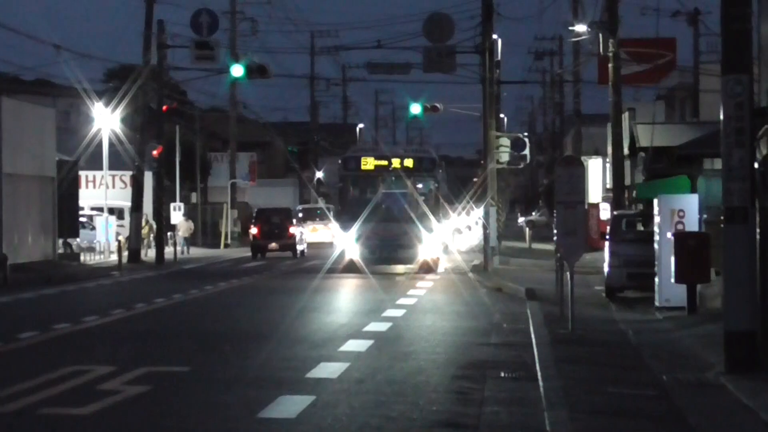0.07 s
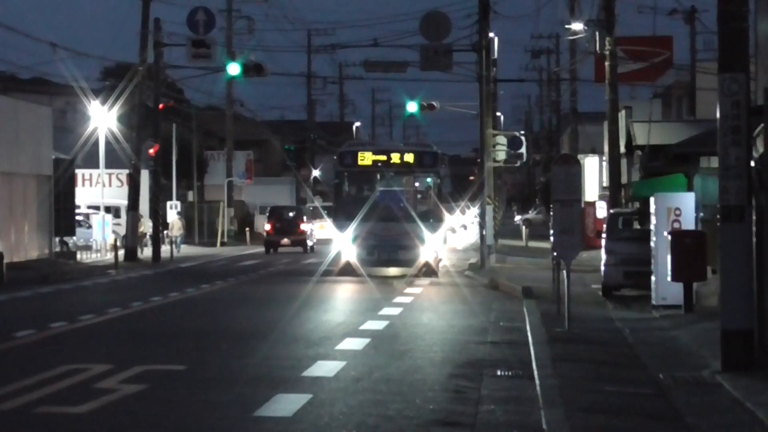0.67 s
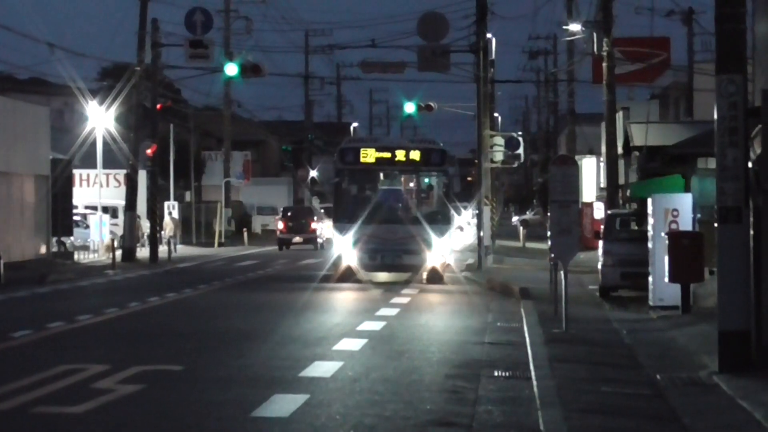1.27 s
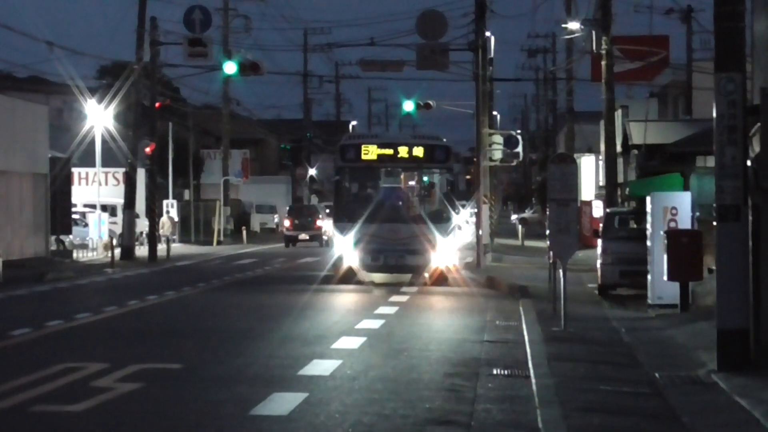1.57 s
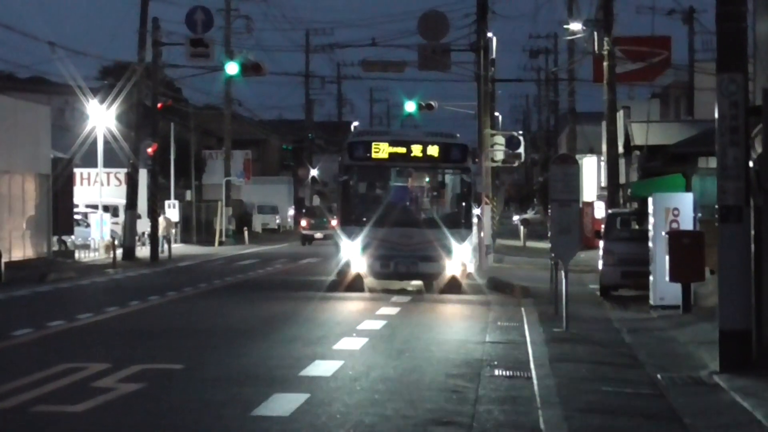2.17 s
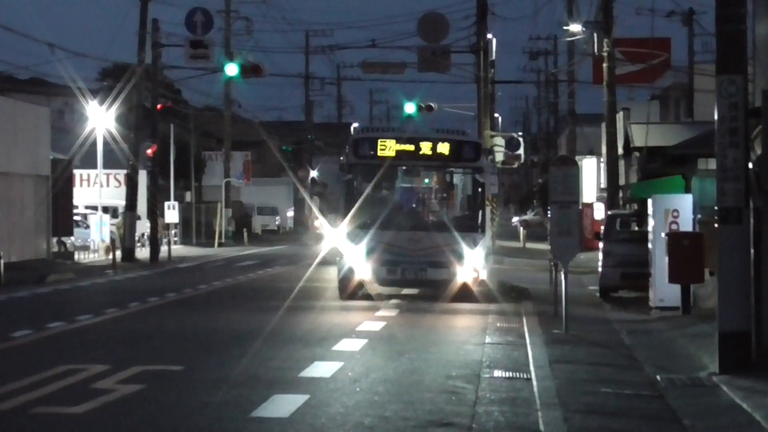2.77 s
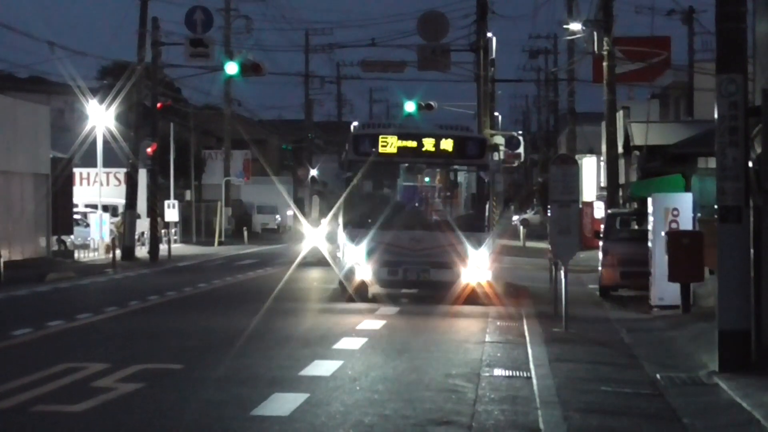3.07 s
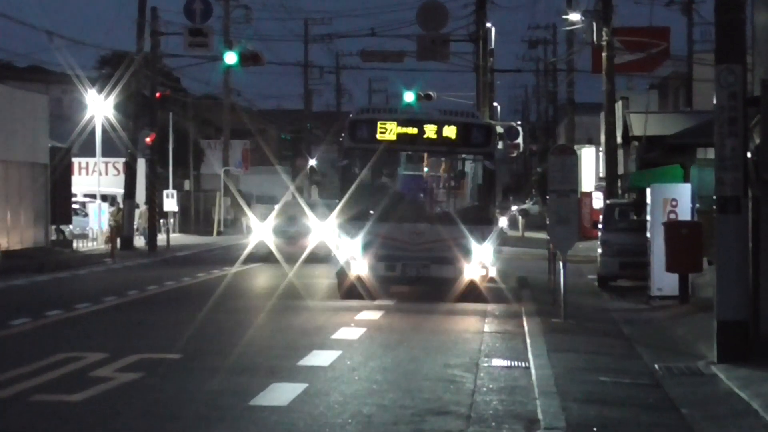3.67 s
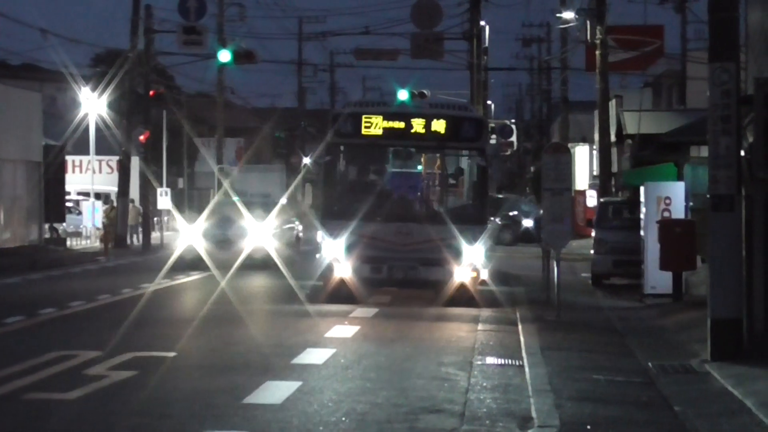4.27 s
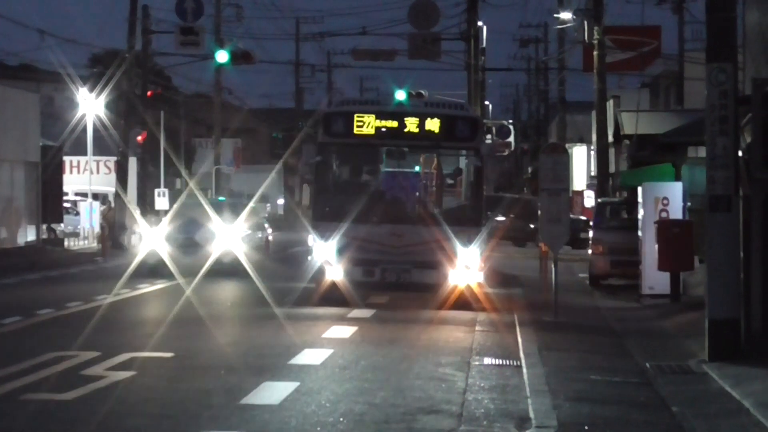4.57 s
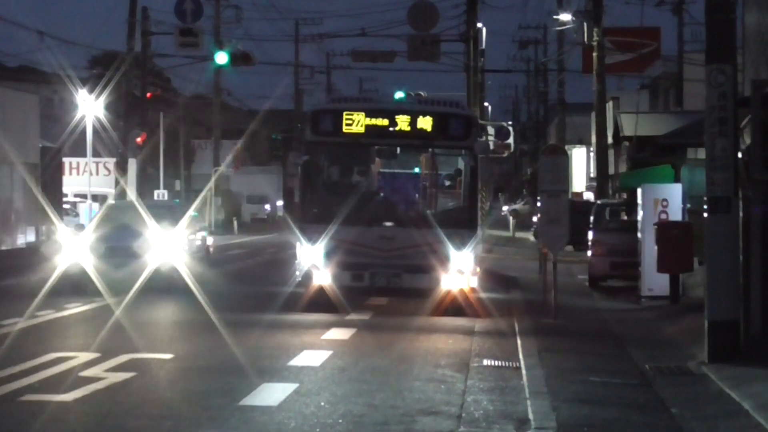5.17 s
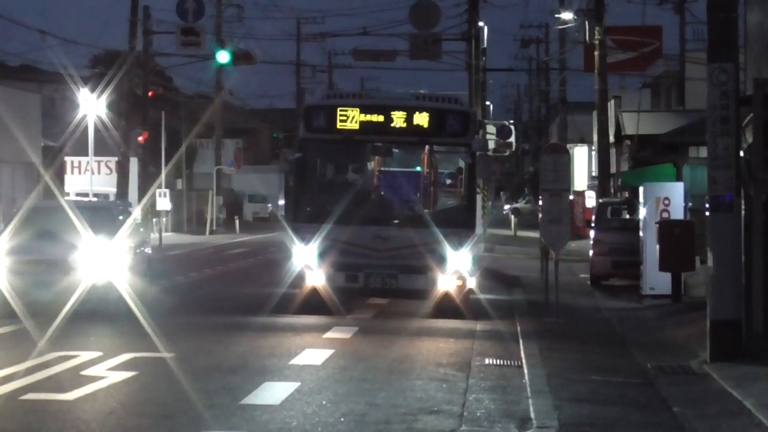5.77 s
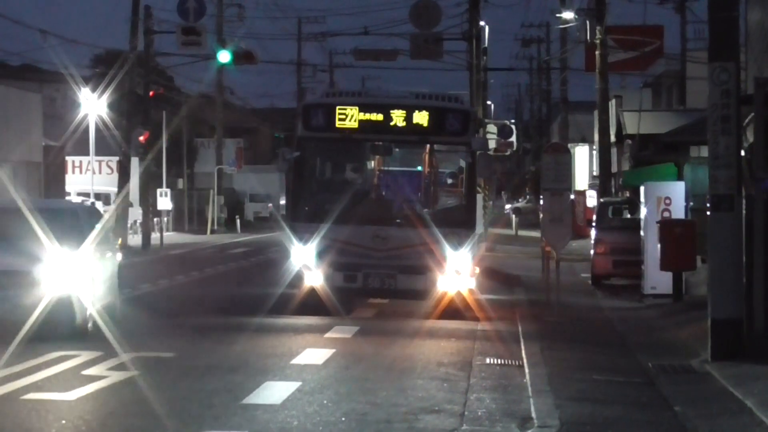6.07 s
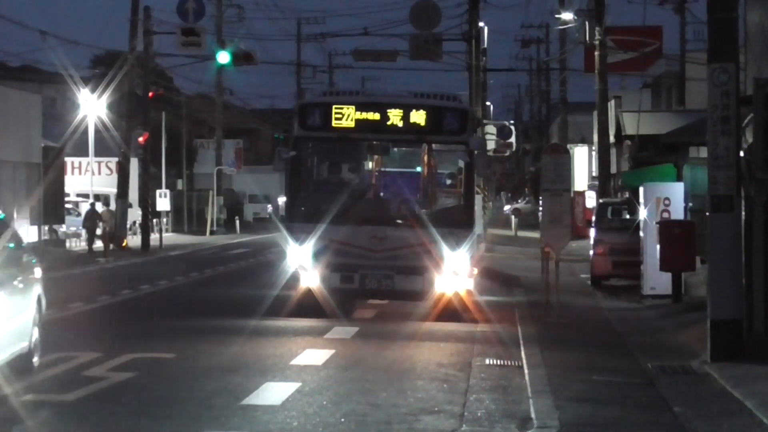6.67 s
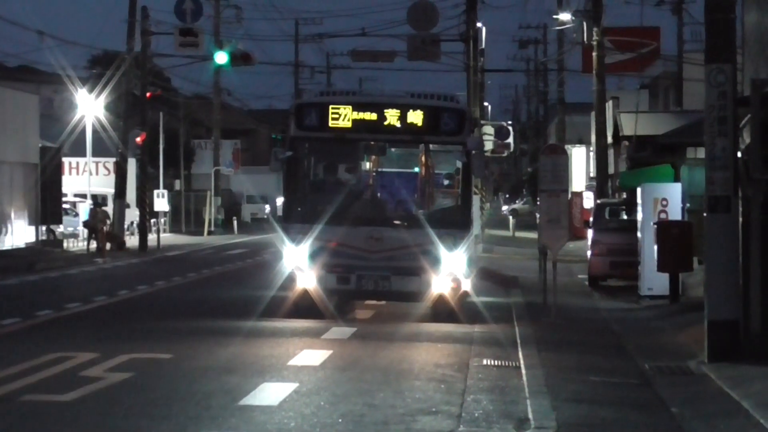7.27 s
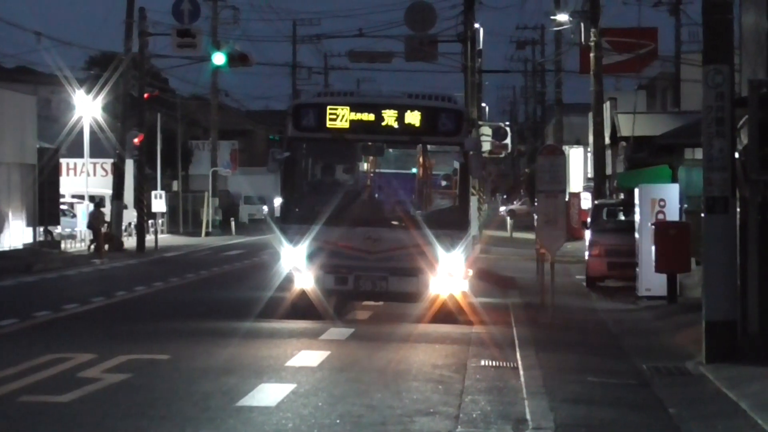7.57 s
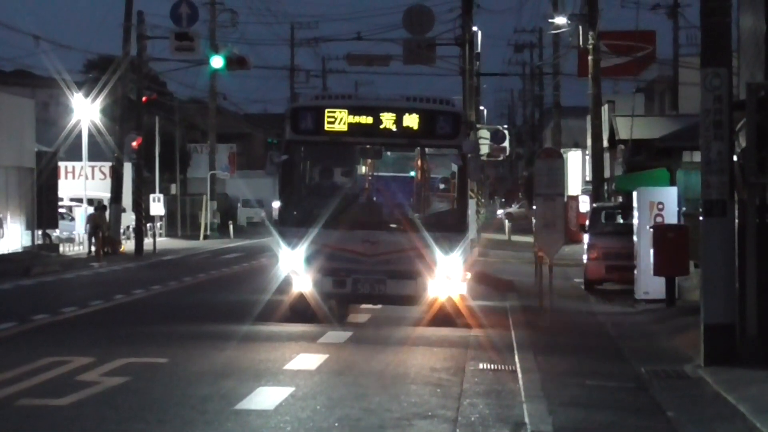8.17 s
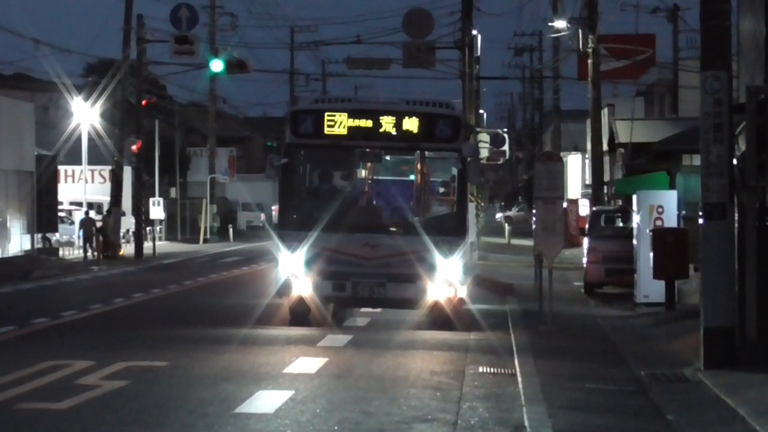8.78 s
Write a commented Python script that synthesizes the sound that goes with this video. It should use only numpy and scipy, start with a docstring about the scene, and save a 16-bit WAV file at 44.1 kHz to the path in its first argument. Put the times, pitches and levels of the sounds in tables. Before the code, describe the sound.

A city bus approaches a roadside microphone with a low engine rumble, a faint rattle and a soft wheel knock, over far traffic and slight wind. It slows with a wavering, high-pitched brake squeal flecked with small chirps. A car draws near, sets a road cover clanking quickly as the squeal ends, and goes by just to the left, its tyre noise peaking and then turning duller.

```python
"""On a narrow street at dusk, far traffic hums and light puffs of wind touch the microphone.
A city bus draws near, its engine rumbling; a loose panel ticks and its wheels knock on a cover.
From about 2 s it slows for a stop, and friction drives its brake drums into a thin, high squeal.
An oncoming car overtakes it, clatters over a cover in the road near 6.7 s as the squeal dies,
and passes close on the left at 8 s in a swell of tyre noise."""
import sys
import numpy as np
from scipy import signal
from scipy.fft import rfft, irfft, next_fast_len
from scipy.io import wavfile
from scipy.ndimage import uniform_filter1d, map_coordinates

SR = 44100
rng = np.random.default_rng(int(sys.argv[2]) if len(sys.argv) > 2 else 0)


def wav_out(sig):
    """Save sig, one row per channel (or a flat mono array), as 16-bit PCM at SR to the path in sys.argv[1]."""
    wavfile.write(sys.argv[1], SR, np.round(np.clip(np.atleast_2d(sig).T, -1, 1) * 32767).astype(np.int16))


N = 388962
TIME = np.arange(N) / SR

# The bus slows to a crawl: time_s, share_of_first_speed
BUS_SPEED = [(2.7, 0.94), (4.5, 0.68), (6.6, 0.17)]
# Main squeal, following the pedal from a first light touch: time_s, level_db
SQUEAL_LEVEL = [(2.2, -63), (2.32, -55), (2.44, -71), (2.55, -62), (2.66, -64), (2.73, -52.5),
                (2.93, -46.5), (3.03, -54.5), (3.15, -51.5), (3.37, -53), (3.58, -40.5), (3.82, -50.5),
                (4.0, -43.5), (4.2, -42.5), (4.36, -43), (4.52, -33.5), (4.85, -38), (5.05, -35.5),
                (5.7, -36.5), (5.95, -35.5), (6.23, -38.5), (6.29, -45.5), (6.42, -44.5), (6.49, -59),
                (6.71, -60)]
# Pitch of the main squeal: time_s, pitch_hz
SQUEAL_PITCH = [(2.22, 8020), (2.5, 8120), (2.75, 8125), (3.7, 8105), (3.95, 8075), (4.15, 8110),
                (4.42, 8065), (4.7, 8080), (5.04, 8015), (5.28, 8068), (5.5, 8058), (5.75, 8095),
                (6.0, 8100), (6.22, 8122), (6.44, 8095), (6.55, 8000), (6.68, 7925)]
# A second brake joins a little higher: time_s, pitch_hz, level_db
SECOND_BRAKE = [(4.15, 8480, -71), (4.55, 8440, -54.5), (4.75, 8475, -54), (5.07, 8425, -52.5),
                (5.27, 8500, -49), (5.45, 8450, -45.5), (5.7, 8360, -50), (5.92, 8300, -47.5),
                (6.12, 8230, -59)]
# Spectrum of the sliding linings: frequency_hz, density_db
SCRAPE_SPECTRUM = [(2600, -14), (3500, 0), (4400, -5), (5600, -11)]
def brakes(rasp_db=-12, scrape_db=-68):
    """Self-excited vibration: friction keeps modes of the drums singing at a trembling pitch."""
    steady_hz, = in_time(SQUEAL_PITCH)
    level_db, = in_time(SQUEAL_LEVEL)
    speed, = in_time(BUS_SPEED)
    hz = steady_hz + (6 + 26 * speed ** 2) * drift(130)
    # the faster the lining slides, the more its grain roughens the tone
    rasp = 1 + from_db(rasp_db) * speed ** 2 * drift(100)
    main = from_db(level_db) * gate(SQUEAL_LEVEL) * rasp * drum_modes(hz, speed, doppler_hz=138.4)
    # the second brake loses its hold on the pitch as it dies away
    second_hz, second_db = in_time(SECOND_BRAKE)
    second_hz += np.interp(TIME, [5.3, 5.7], [22, 105]) * drift(190)
    second = from_db(second_db) * gate(SECOND_BRAKE) * drum_modes(second_hz, speed, doppler_hz=59)
    scrape = from_db(scrape_db) * gate(SQUEAL_LEVEL, fade_s=0.22) * noise(SCRAPE_SPECTRUM)
    return pan(main + second + scrape, left_db=1.2)


def drum_modes(hz, speed, doppler_hz, beat_hz=18.4, twin_db=-7, scatter_db=1, echo_db=-7):
    """Beating: two close modes interfere; their sum with many reflections is held at a steady level."""
    pair = rms_one(tone(hz) + from_db(twin_db) * tone(hz - beat_hz))
    heard = pair + from_db(scatter_db) * wall_paths(hz, speed, doppler_hz)
    heard += from_db(echo_db) * street_echo(pair, correlation=0.14)
    return heard / np.sqrt(uniform_filter1d(heard ** 2, size=SR // 9) + 1e-6)


def wall_paths(hz, speed, doppler_hz, fading_hz=14, wander_hz=14, width=0.71):
    """Doppler effect: paths leaving the bus sideways rise less in pitch; each wanders and fades alone."""
    paths = 0
    for share in (0, 0.25, 1):
        path = tone(hz - share * doppler_hz * speed + wander_hz * drift(19.94))
        paths += path * (drift(fading_hz) + width * drift(fading_hz) * [[1], [-1]])
    return rms_one(paths)


# Under the hardest braking the drum catches at half the squeal's pitch:
# centre_s, length_s, level_db, third_harmonic_db
DRUM_SPURTS = [(4.24, .05, -63, -80), (4.965, .12, -58.5, -71), (5.048, .06, -54.5, -70),
               (5.162, .13, -51, -63), (5.285, .07, -54, -72), (5.352, .11, -45.5, -61),
               (5.435, .06, -50.5, -65), (5.49, .08, -56, -64)]
# Other brake modes chirp, each sagging in pitch: centre_s, length_s, pitch_hz, level_db, left_db
MODE_CHIRPS = [(2.35, .2, 9020, -72, 0), (4.22, .07, 12150, -74, -5), (4.56, .08, 12200, -72, -4),
               (4.88, .15, 11000, -68, 0), (4.905, .06, 11040, -57, -1), (5.29, .08, 11000, -66, -1),
               (5.36, .12, 5885, -73, 2), (5.485, .09, 5875, -68.5, 3), (5.63, .11, 12450, -65.5, -5),
               (5.855, .13, 12460, -67, -5), (5.865, .15, 5958, -65, 5), (5.87, .16, 14050, -74, -2),
               (6.08, .17, 5952, -69, 2), (6.1, .15, 12457, -66, -3), (6.29, .08, 5958, -67, 4),
               (6.37, .1, 5930, -72, 3)]
def brake_chirps(chatter_db=4.5, tremble_share=0.0028, sag_hz_per_s=300, echo_db=-6):
    """Intermittent excitation: fainter drum modes catch for a moment and reverberate in the street."""
    steady_hz, = in_time(SQUEAL_PITCH)
    half_hz = steady_hz / 2 + 6 * drift(40)
    envelopes = [np.sqrt(swell(s, length)) * from_db([[db], [third_db]])
                 for s, length, db, third_db in DRUM_SPURTS]
    spurt, overtone = np.max(envelopes, axis=0)
    chatter = from_db(chatter_db * drift(45))
    tremble = 1 + tremble_share * drift(68)
    out = pan(spurt * tone(half_hz), left_db=1.5)
    out += pan(overtone * chatter * tone(3 * half_hz), left_db=-4)
    for s, length, hz, db, left_db in MODE_CHIRPS:
        now = np.abs(TIME - s) < length / 2
        pitch_hz = hz * tremble[now] - sag_hz_per_s * (TIME[now] - s)
        out[:, now] += pan(from_db(db) * swell(s, length)[now] * chatter[now] * tone(pitch_hz), left_db)
    echo = from_db(echo_db)
    return (out + echo * street_echo(out.mean(axis=0), correlation=0)) / np.hypot(1, echo)


# Spectrum of engines and rolling wheels: frequency_hz, density_db
RUMBLE_SPECTRUM = [(30, -21), (60, -18.5), (85, -6.5), (130, -6), (165, -6.5), (205, 4), (250, 1),
                   (285, -3), (335, -5), (400, -24), (600, -33), (1200, -58)]
# Uneven road makes the wheels boom: centre_s, length_s, level_db
WHEEL_BOOMS = [(.42, 0.92, -37.5), (1.08, 0.39, -34), (3.433, 0.48, -35.5), (4.142, 0.17, -35),
               (6.848, 0.77, -29)]
def rumble(bus_db=-39, rise_db_per_s=0.1449, car_db=-29.5, car_falloff=0.37, rear_db=3.5, throb_db=1.0):
    """Low-frequency radiation: the engines and wheels of bus and car grow louder as they draw near."""
    spreading_db, bearing = car_path()
    booms = sum(from_db(db) * swell(s, length) for s, length, db in WHEEL_BOOMS)
    bus = np.hypot(from_db(bus_db + rise_db_per_s * TIME), booms) * noise(RUMBLE_SPECTRUM)
    emerged = ramp(EMERGED_S - EMERGING_S, EMERGING_S)
    car_gain = from_db(car_db + car_falloff * spreading_db - rear_db * bearing) * emerged
    car = butterworth(car_gain * noise(RUMBLE_SPECTRUM), 120, "high")   # lighter, so less deep bass
    return pan(from_db(throb_db * drift(44)) * (bus + car), left_db=1.5)


# Spectra of the car's tread roar, hiss, body drone and fine sizzle: frequency_hz, density_db
ROAR_SPECTRUM = [(200, -5), (430, -25.5), (600, -3.5), (760, 0), (950, 1), (1120, -2.5), (1300, -9),
                 (1600, -37), (2000, -40), (2600, -28)]
HISS_SPECTRUM = [(800, -55), (1350, 17.5), (1650, 13.5), (1820, 7.5), (2050, 9.5), (2250, 4.5),
                 (2550, -4.5), (3100, -4), (3500, -1), (4400, -6.5), (5300, -13.5), (7000, -13.5),
                 (10000, -33), (15500, -50)]
BODY_SPECTRUM = [(70, -72), (140, -12), (200, -17), (260, 6.5), (330, 5.5), (420, -2), (520, -0.5),
                 (700, -13), (1000, 1.5), (1500, -43)]
SIZZLE_SPECTRUM = [(3000, -29), (5400, -29), (6600, 0), (7600, 1), (9200, 2), (10500, -4.5), (12500, -5.5),
                   (14500, -13), (16000, -28)]
# The car's tyre roar surges briefly as it nears and passes: centre_s, length_s, gain_db
TYRE_SURGES = [(3.9, 0.27, 6.5), (6.144, 0.72, 2), (7.68, .6, 1.8), (8.165, 0.085, 4.8)]
# The car leans left, most of all once it has passed: time_s, left_db
CAR_BALANCE = [(5.5, -1), (7.7, 0.5), (8.05, 3.5), (8.3, 2.5), (8.8, 3.5)]
EMERGED_S, EMERGING_S = 4.64, 1.33   # when the car is clear of the bus, and its run-up to that
def passing_car(screen_db_per_s=9.774, grain_db=0.5, right_lag_s=61e-6):
    """Rolling noise: the tyres roar and hiss as the car leaves the bus's acoustic shadow and goes by."""
    screen = from_db(-screen_db_per_s * np.maximum(EMERGED_S - TIME, 0))
    road = screen * from_db(grain_db * drift(35))   # coarse asphalt shakes all tyre noise together
    surges = from_db(sum(db * swell(s, length) for s, length, db in TYRE_SURGES))
    roar = surges * radiated(ROAR_SPECTRUM, near_db=-20, front_db=1.7, falloff=0.92)
    hiss = surges ** 0.36 * radiated(HISS_SPECTRUM, near_db=-31, front_db=2.5, falloff=0.83)
    body = surges ** 0.72 * radiated(BODY_SPECTRUM, near_db=-22.5, front_db=-0.86, falloff=0.9)
    sizzle = surges ** 0.27 * radiated(SIZZLE_SPECTRUM, near_db=-44.5, front_db=0, falloff=0.75)
    # once the car is behind the microphone, its treble is shaded off
    shaded = ramp(8.19, 0.14)
    hiss *= from_db(-3 * shaded)
    sizzle *= from_db(-16 * shaded)
    left_db, = in_time(CAR_BALANCE)
    treble = pan(hiss, left_db=2) + pan(sizzle, 0.35 * left_db)
    left, right = pan(road * roar + screen * body, left_db) + road * treble
    # as the car goes by, its sound comes to reach the right side later
    _, bearing = car_path()
    lag_samples = right_lag_s * SR * (1 - bearing) / 2
    return np.array([left, map_coordinates(right, [np.arange(N) - lag_samples], order=3, mode="nearest")])


def car_path(pass_s=7.96, speed_m_per_s=11.44, lane_m=3.71):
    """Spherical spreading on a straight pass: dB relative to the nearest, bearing (1 ahead, -1 behind)."""
    ahead_m = speed_m_per_s * (pass_s - TIME)
    distance_m = np.hypot(ahead_m, lane_m)
    return 20 * np.log10(lane_m / distance_m), ahead_m / distance_m


def radiated(spectrum, near_db, front_db, falloff):
    """Directivity and spreading: a car noise with a forward bias, fading as distance ** -falloff."""
    spreading_db, bearing = car_path()
    return from_db(near_db + front_db * bearing + falloff * spreading_db) * noise(spectrum)


# Wheels strike covers in the road, first the bus's, then the car's, whose cover rocks to rest:
# start_s, thud_db, clank_db, tick_db, clank_tilt_db_per_octave
WHEEL_STRIKES = [(1.111, -18, -51, -73, 0), (1.133, -18, -51, -73, 0), (1.222, -26, -43, -73, 0),
                 (5.91, -43, -28, -47, 0), (6.639, -24, -18, -60, -1), (6.6645, -15, -20, -30, 2),
                 (6.6807, -12, -15.5, -48, -1), (6.689, -16.5, -13.5, -43, -1), (6.7055, -28, -17, -60, -1),
                 (6.7132, -19, -10.5, -38, 2), (6.7305, -30, -19, -60, -2), (6.738, -33, -15.5, -50, 2),
                 (6.754, -26, -16, -60, -2), (6.7778, -29, -14.5, -60, -2), (6.787, -30, -23, -60, 3),
                 (6.825, -27, -17, -60, -3), (6.838, -25, -18, -45, -5), (6.886, -17, -16, -55, -4),
                 (6.91, -23, -26, -40, 0), (6.934, -28, -19, -55, -2), (6.983, -35, -18, -60, -6)]
# Modes of a cover: pitch_hz, gain_db, t60_s
COVER_MODES = [(717, -8.5, 0.065), (927, 0, 0.03), (1136, -1.5, 0.021), (1634, -8.5, 0.014),
               (2300, -24, 0.011), (2760, -18, 0.0083), (3700, -16.5, 0.0029)]
def cover_knocks(echo_db=-11, hop_db=-25, grit_decay_s=0.0022):
    """Impact excitation: a knock rings the cover and the tyre's air cavity and carcass, and flicks grit."""
    thud, clank, tick = np.zeros((3, N))
    start_s, thud_db, clank_db, tick_db, tilt = np.transpose(WHEEL_STRIKES)
    at = (start_s * SR).astype(int)
    thud[at], tick[at] = from_db(thud_db), from_db(tick_db)
    out = ring(thud, hz=243.6, t60_s=0.063)   # the air cavity
    for k, (hz, db, t60_s) in enumerate(COVER_MODES):
        octaves = np.log2(hz / COVER_MODES[1][0])   # from the strongest mode
        clank[at] = from_db(clank_db + db + tilt * octaves + rng.normal(0, 1.0, len(at)))
        out += (-1) ** k * ring(clank, hz, t60_s)
    crack = rng.standard_normal(SR // 100) * np.exp(-TIME[:SR // 100] / grit_decay_s)
    grit = butterworth(crack, [4200, 11500], "band")
    out += signal.fftconvolve(tick, grit)[:N]
    out = butterworth(out, 130, "high")   # small bodies radiate no deep bass
    out += from_db(hop_db) * butterworth(ring(thud, hz=70, t60_s=0.29), 55, "high")   # the carcass
    return pan(out + from_db(echo_db) * street_echo(out), left_db=2.5)


# A loose panel on the bus ticks and bounces: start_s, gain_db
PANEL_TOUCHES = [(.841, 6), (.858, -1), (.868, -1)]
# Spectrum of a touch: frequency_hz, density_db
PANEL_SPECTRUM = [(1500, 9), (2900, -5), (3500, -2), (4500, -13), (8000, -24)]
def panel_rattle(level_db=-50, decay_s=0.0041):
    """Damped impacts: each touch of the panel is a dry burst of noise that decays exponentially."""
    bursts = sum(from_db(level_db + db) * (TIME >= s) * np.exp(-abs(TIME - s) / decay_s)
                 for s, db in PANEL_TOUCHES)
    return bursts * noise(PANEL_SPECTRUM)


# Loudness of the far traffic: time_s, level_db
FAR_TRAFFIC_LEVEL = [(0, -39), (2, -42), (4, -44), (8.8, -34)]
# Its spectrum: frequency_hz, density_db
TRAFFIC_SPECTRUM = [(250, -1.5), (400, 0), (680, 2.5), (1000, -5), (1400, -7.5), (1800, -19.5),
                    (2100, -15.5), (2600, -26), (3500, -24.5), (5500, -36), (8800, -33.5), (11500, -37.5),
                    (15500, -43)]
def far_traffic():
    """Incoherent summation: vehicles farther up the street merge into one smooth wash of noise."""
    level_db, = in_time(FAR_TRAFFIC_LEVEL)
    return pan(from_db(level_db) * noise(TRAFFIC_SPECTRUM), left_db=-0.5)


# Puffs of wind: centre_s, length_s, level_db
WIND_PUFFS = [(0.05, 0.082, -30), (0.377, 0.27, -39), (1.036, 0.084, -37), (2.45, 0.65, -45),
              (2.76, 0.092, -32), (3.279, 0.13, -29), (3.632, 0.071, -36), (4.25, 0.22, -41),
              (4.667, 0.17, -39)]
# Spectrum of the eddies: frequency_hz, density_db
EDDY_SPECTRUM = [(25, -20), (45, -4), (90, -1.5), (130, -1.5), (220, -14), (400, -27)]
def wind(breeze_db=-54, gust_db=5):
    """Turbulent pressure: eddies push on the microphone's two ports, mostly in opposite senses."""
    breeze = from_db(breeze_db + gust_db * drift(3.1))
    puffs = pan(sum(from_db(db) * swell(s, length) for s, length, db in WIND_PUFFS), left_db=5.5)
    eddies = noise(EDDY_SPECTRUM)
    eddies = rms_one(eddies + 0.5 * eddies[::-1]) * [[1], [-1]]
    return np.hypot(breeze, puffs) * eddies


def street_echo(x, correlation=0.28, t60_s=0.32):
    """Reverberation: dense reflections from house fronts, poles and the road, at unit gain."""
    t = TIME[:SR // 2]
    mid, side = rng.standard_normal((2, len(t))) * from_db(-60 * t / t60_s)
    response = rms_one(stereo(mid, side, correlation)) / np.sqrt(len(t))
    return signal.fftconvolve(x[None], response, axes=1)[:, :N]


# Likeness of left and right, greatest in the upper bass: frequency_hz, correlation
STEREO_COHERENCE = [(40, 0.062), (130, 1), (280, 0.93), (700, 0.88), (1400, 0.79), (3100, 0.67),
                    (7000, 0.41), (15000, 0.21)]
def noise(spectrum):
    """Spectral shaping: partly coherent stereo noise of unit power, falling away past the table's ends."""
    size = next_fast_len(N)
    hz = np.arange(size // 2 + 1) * SR / size
    mid, side = rfft(rng.standard_normal((2, size)))
    white = stereo(mid, side, np.clip(at_hz(STEREO_COHERENCE, hz), -0.99, 0.99))
    skirts = np.minimum(1, np.minimum(hz / spectrum[0][0], spectrum[-1][0] / (hz + 1))) ** 2
    return rms_one(irfft(white * skirts * from_db(at_hz(spectrum, hz)), size)[:, :N])


def drift(rate_hz, step=40, settle=2000):
    """Random modulation: low-passed noise of unit spread."""
    pole = np.exp(-2 * np.pi * rate_hz * step / SR)
    white = rng.standard_normal(N // step + settle + 2)
    slow = signal.lfilter([1], [1, -2 * pole, pole * pole], white)[settle:]
    return np.interp(np.arange(N) / step, np.arange(len(slow)), rms_one(slow))


def ring(clicks, hz, t60_s):
    """Damped resonance: a unit click starts a decaying sine of height 1."""
    radius, angle = from_db(-60 / (t60_s * SR)), 2 * np.pi * hz / SR
    return signal.lfilter([0, np.sin(angle)], [1, -2 * radius * np.cos(angle), radius ** 2], clicks + 1e-18)


def tone(hz):
    """Phase integrates frequency: a sine of unit power along a pitch curve."""
    return np.sqrt(2) * np.sin(2 * np.pi * np.cumsum(hz) / SR)


def butterworth(x, hz, kind):
    """Maximally flat filtering, with slopes of 12 dB per octave."""
    return signal.sosfilt(signal.butter(2, hz, kind, fs=SR, output="sos"), x)


def stereo(mid, side, correlation):
    """Sum and difference: two independent noises give a correlated left and right."""
    return np.sqrt(1 + correlation) * mid + np.sqrt(1 - correlation) * side * [[1], [-1]]


def pan(x, left_db):
    """Level difference: the left channel exceeds the right by left_db."""
    return x * from_db(np.array([[0.5], [-0.5]]) * left_db)


def swell(centre_s, length_s):
    """Parabolic envelope of height 1."""
    return np.maximum(1 - (2 * (TIME - centre_s) / length_s) ** 2, 0)


def ramp(start_s, length_s):
    """Linear rise from 0 to 1."""
    return np.clip((TIME - start_s) / length_s, 0, 1)


def gate(rows, fade_s=0.018):
    """Trapezoidal envelope, open between a curve's first and last times."""
    return np.clip(np.minimum(TIME - rows[0][0], rows[-1][0] - TIME) / fade_s, 0, 1)


def in_time(rows):
    """Linear interpolation of a curve's columns at every sample."""
    time_s, *columns = np.transpose(rows)
    return [np.interp(TIME, time_s, column) for column in columns]


def at_hz(points, hz):
    """Interpolation on a log-frequency axis."""
    frequency_hz, value = np.transpose(points)
    return np.interp(np.log(hz + 1e-9), np.log(frequency_hz), value)


def from_db(db):
    """Decibels to amplitude ratio."""
    return 10 ** (np.asarray(db) / 20)


def rms_one(x):
    """Normalisation to unit power."""
    return x / np.sqrt(np.mean(np.abs(x) ** 2) + 1e-20)


def scene():
    """Superposition: the pressures of all the sources add."""
    return (rumble() + far_traffic() + brakes() + brake_chirps()
            + passing_car() + cover_knocks() + panel_rattle() + wind())


def record(dry, cutoff_hz=15750):
    """Band limiting: the microphone opens after a moment, and a steep low-pass cuts the top."""
    opened = dry * ramp(0.041, 0.002)
    return signal.sosfilt(signal.ellip(10, 0.1, 80, cutoff_hz, fs=SR, output="sos"), opened)


dry = scene()
out = record(dry)
wav_out(out)
```